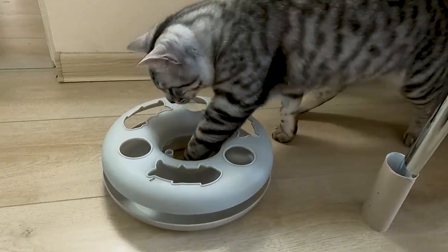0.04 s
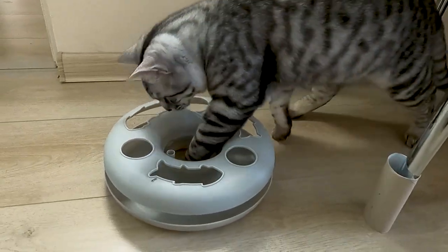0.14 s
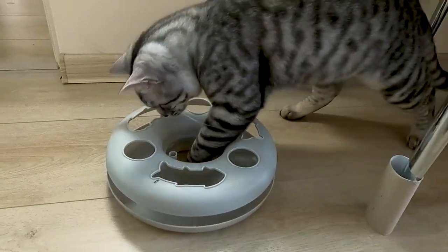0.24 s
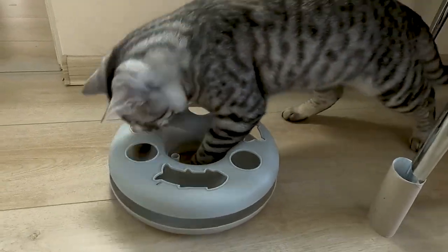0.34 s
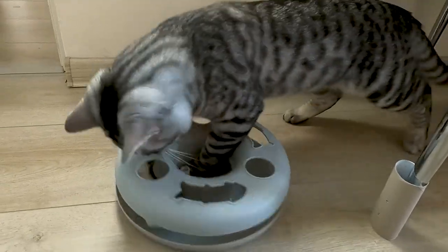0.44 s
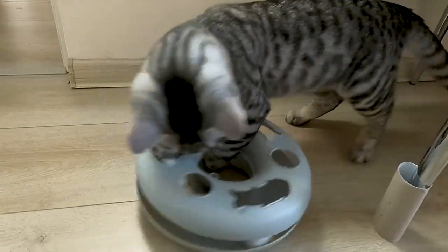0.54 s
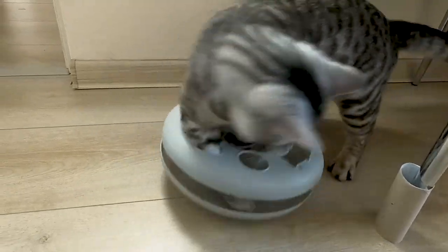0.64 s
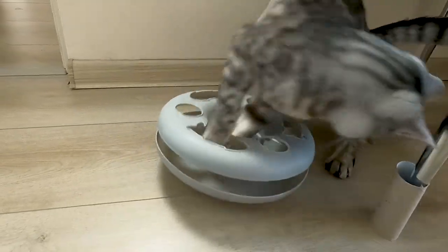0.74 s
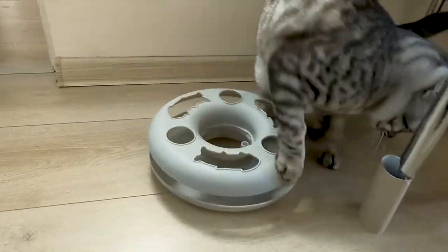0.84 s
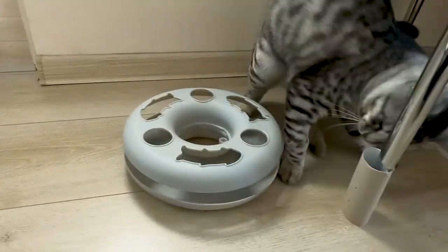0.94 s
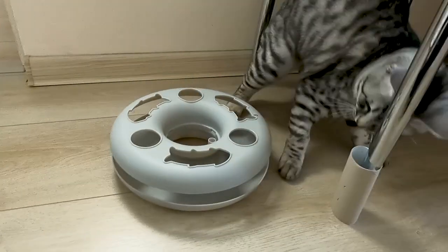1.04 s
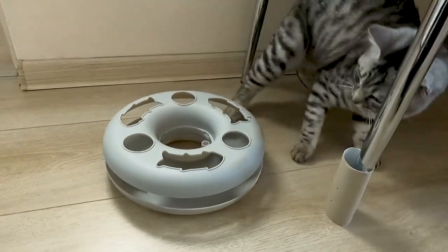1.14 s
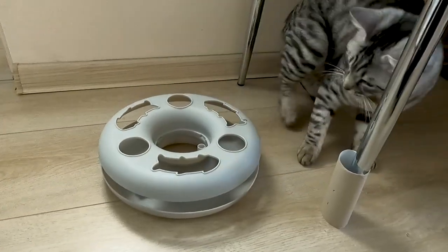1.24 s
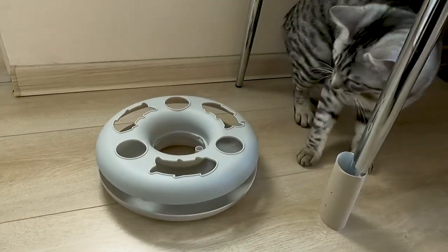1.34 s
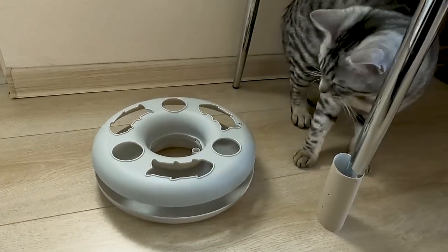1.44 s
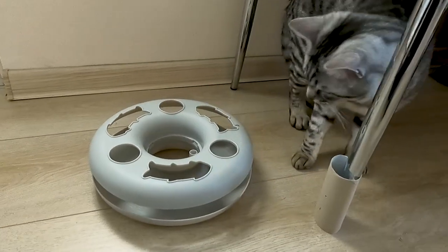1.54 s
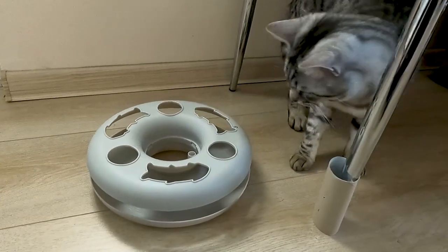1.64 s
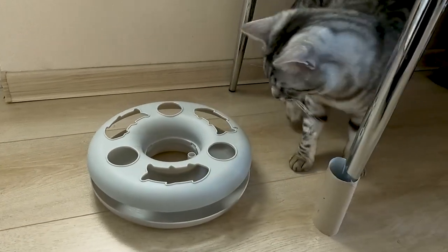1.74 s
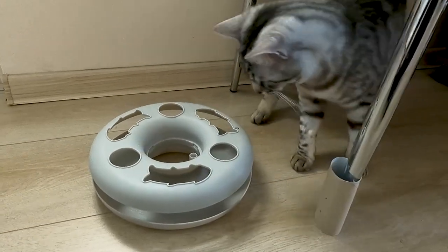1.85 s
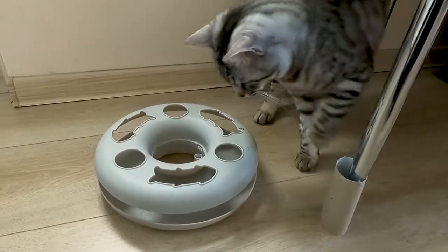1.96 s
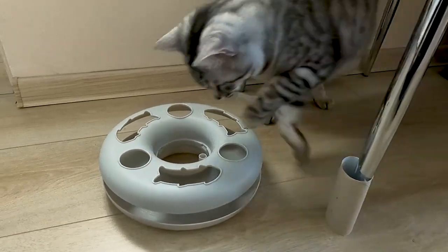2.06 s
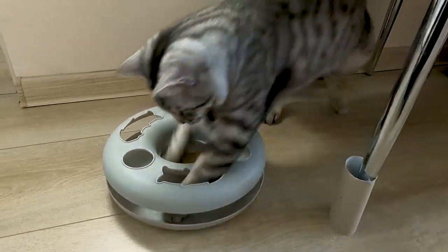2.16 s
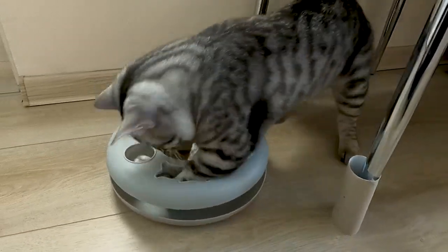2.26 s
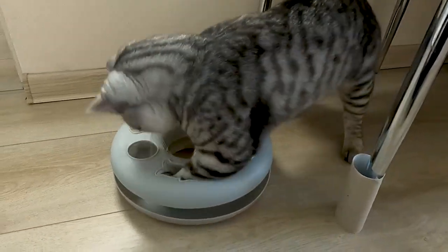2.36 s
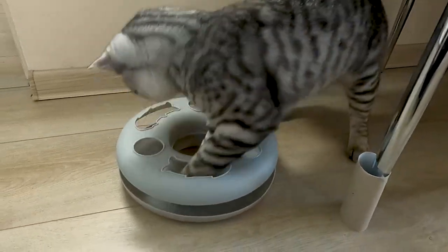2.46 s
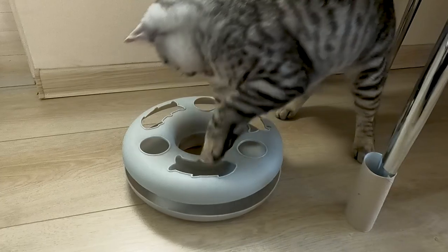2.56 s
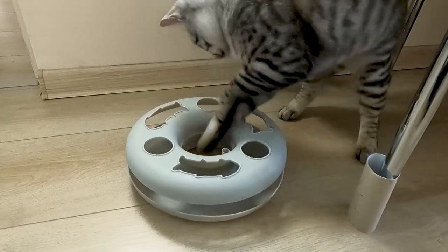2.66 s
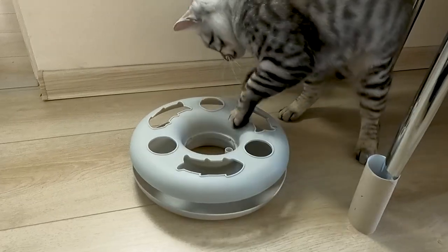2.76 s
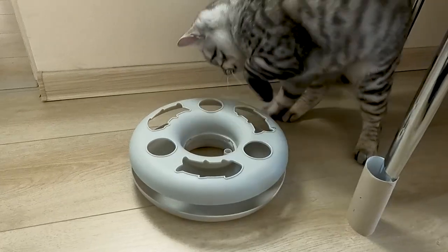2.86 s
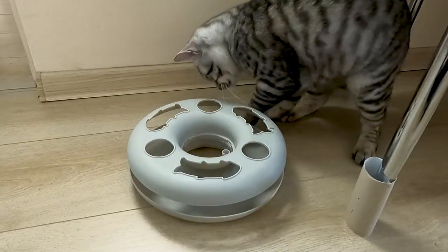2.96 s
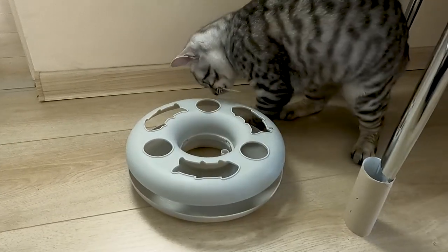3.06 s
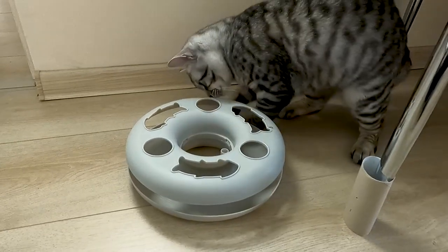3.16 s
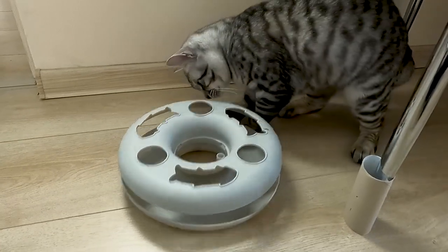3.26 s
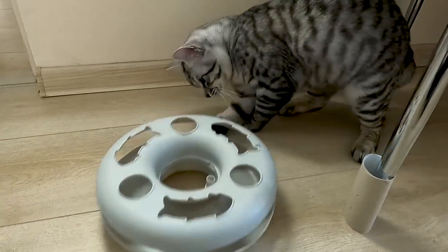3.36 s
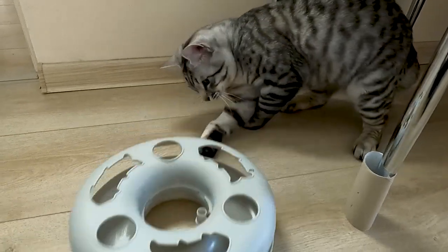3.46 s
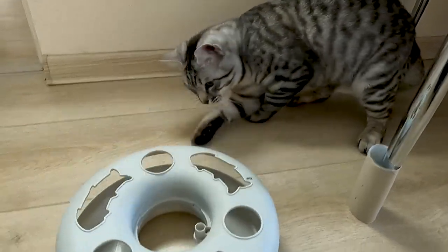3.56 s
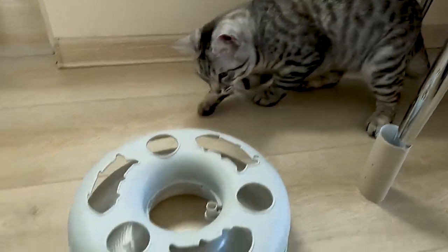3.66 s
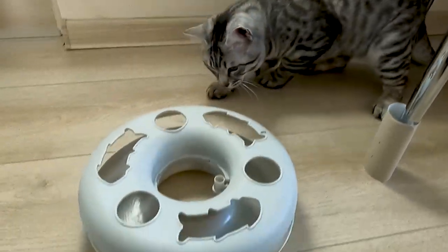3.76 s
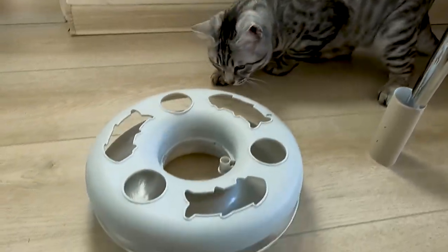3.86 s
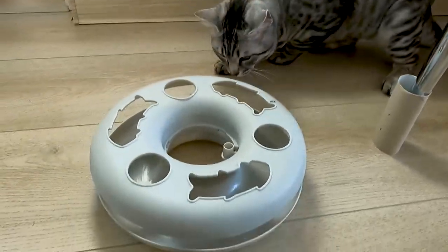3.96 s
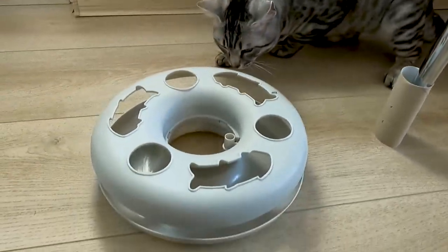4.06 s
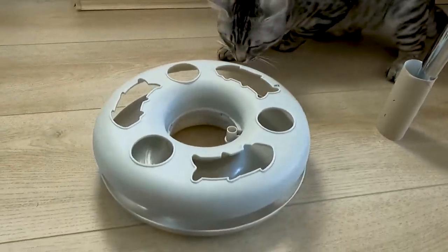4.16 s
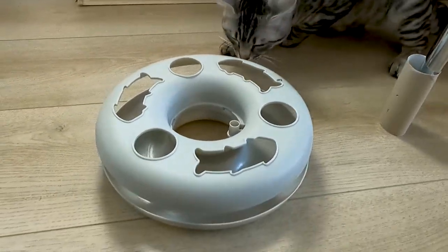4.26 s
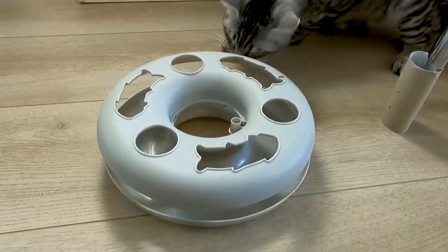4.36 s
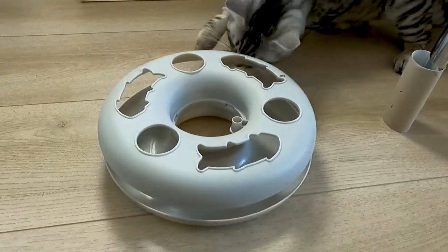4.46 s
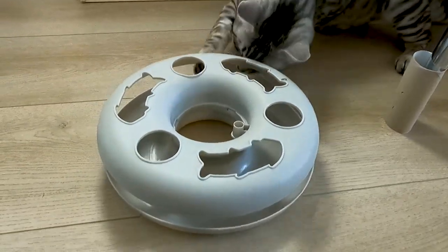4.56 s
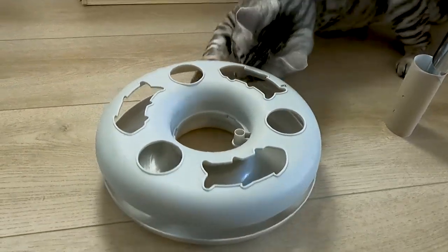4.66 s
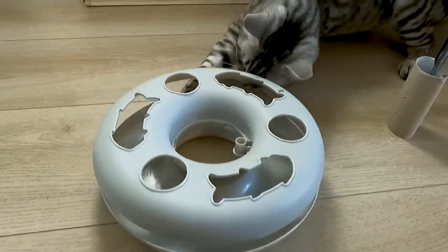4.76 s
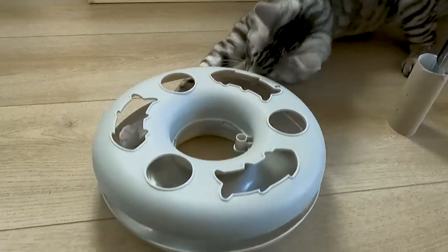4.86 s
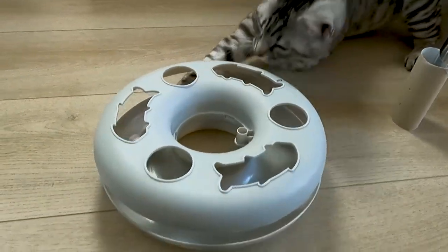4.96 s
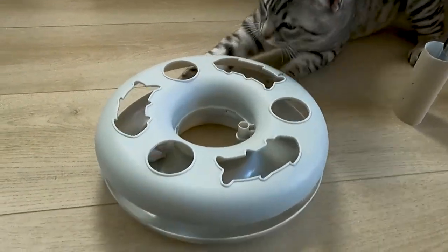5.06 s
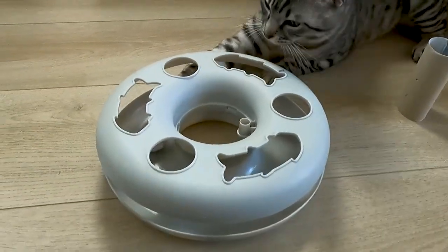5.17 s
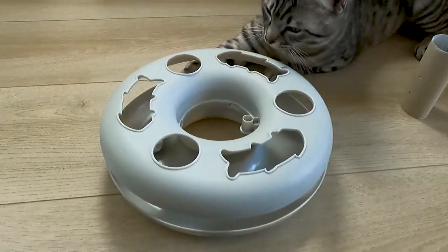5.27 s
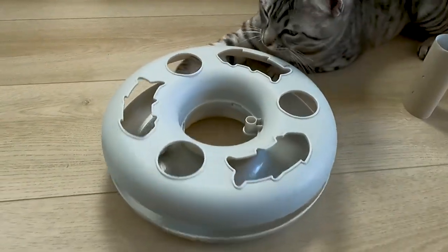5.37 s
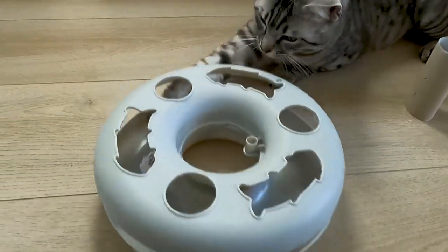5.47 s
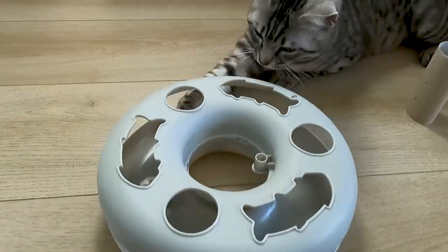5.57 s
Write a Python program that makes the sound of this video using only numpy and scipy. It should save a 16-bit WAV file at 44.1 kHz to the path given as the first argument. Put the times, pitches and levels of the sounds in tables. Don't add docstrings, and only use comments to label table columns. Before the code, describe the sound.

In a small quiet room, a cat paws a hollow plastic ring toy on laminate. Near silence, then a loud gritty scrape with clattering knocks and a sharp squeak; light taps and brief rubs follow, then a smoother second scrape, a pause, a snap, and hesitant jerky drags. Close handheld stereo pickup with faint hiss and low handling rumble.

```python
import sys
import numpy as np
from scipy import signal
from scipy.fft import rfft, irfft, next_fast_len
from scipy.io import wavfile
from scipy.ndimage import uniform_filter1d

SR = 44100
rng = np.random.default_rng(int(sys.argv[2]) if len(sys.argv) > 2 else 0)


def ratio_of_db(decibels):
    return 10 ** (np.asarray(decibels, float) / 20)


def transcribe(u):
    v = np.clip(np.atleast_2d(u).T, -1, 1)
    q = np.round(v * 32767).astype(np.int16)
    wavfile.write(sys.argv[1], SR, q)


N = 247401
TICKS_S = np.arange(0, N, 16) / SR
OPPOSITE = np.array([[1], [-1]])


def noise():
    return rng.standard_normal(N)


def grit(rate_hz, spread_db):
    hits = rng.random(N) < rate_hz / SR
    return unit(hits * noise() * ratio_of_db(spread_db * rng.exponential(size=N)))


def unit(x):
    return x / np.sqrt(np.mean(x ** 2))


def walk(rate_hz):
    hold = int(SR / rate_hz)
    steps = np.repeat(rng.standard_normal(N // hold + 1), hold)
    return unit(uniform_filter1d(steps, hold)[:N])


def ring(x, hz, width_hz):
    return signal.lfilter(*signal.iirpeak(hz, hz / width_hz, fs=SR), x)


def body(x, modes):
    return sum((-1) ** k * ratio_of_db(db) * ring(x, hz, width_hz) for k, (hz, width_hz, db) in enumerate(modes))


def ports(pair, side_db):
    return pair[0] + ratio_of_db(side_db) * pair[1] * OPPOSITE


def curve(rows, column):
    return np.interp(TICKS_S, *np.array(rows)[:, [0, column]].T)


def peaks(rows, rise_db_per_s):
    rows = np.array(rows)
    since_s = TICKS_S - rows[:, :1]
    return np.where(since_s < 0, rise_db_per_s * since_s, -rows[:, -1:] * since_s)


def full(slow):
    return np.interp(np.arange(N) / SR, TICKS_S, slow)


def slow_gain(db):
    return np.repeat(ratio_of_db(db[::16]), 16)[:N]


def bands(source, spectrum, flicker_db, flicker_hz, wide_hz, side_db, spot=0., spot_db=0., spot_width=.2):
    hz_at, db_at = np.transpose(spectrum)
    octaves = np.log2(min(hz_at[-1], 16000) / hz_at[0])
    pair = np.array([source(), source()])
    out = 0
    for hz in hz_at[0] * 2 ** np.arange(0, octaves, 1 / 4):
        edges_hz = [hz / 2 ** (1 / 8), hz * 2 ** (1 / 8)]
        mid, side = signal.sosfilt(signal.butter(2, edges_hz, "bandpass", fs=SR, output="sos"), pair)
        db = np.interp(np.log(hz), np.log(hz_at), db_at) + flicker_db * walk(flicker_hz)
        db = db + spot_db * np.exp(-((np.log(hz) - spot) / spot_width) ** 2)
        db = db - 5.0 * np.clip(spot - np.log(hz) - .4, 0, None)
        band = mid + ratio_of_db(side_db) * hz / (hz + wide_hz) * side * OPPOSITE
        out = -out + slow_gain(db) * band
    return unit(out)


# (frequency [Hz], density [dB per Hz])
HISS_SPECTRUM = [(90, -9.5), (160, 1.5), (200, -1), (300, -7.5), (500, -12), (800, -16), (1300, -16.5),
                 (2000, -24), (3600, -32), (5200, -26), (7600, -31), (9000, -43), (13000, -54)]
# (frequency [Hz], level [dB])
APPLIANCE_HUM = [(156.1, -91.5), (183.0, -87), (619.1, -99.5), (716.0, -87.5)]
HISS_DB = -70


def hush():
    t = np.arange(N) / SR
    hum = 0
    for hz, db in APPLIANCE_HUM:
        hum = hum + np.sqrt(2) * ratio_of_db(db + 2.9 * walk(4.3)) * np.sin(2 * np.pi * hz * t)
    hiss = bands(noise, HISS_SPECTRUM, flicker_db=3.0, flicker_hz=10, wide_hz=400, side_db=2.5)
    return hum + ratio_of_db(HISS_DB) * hiss


# (frequency [Hz], width [Hz], level [dB])
BOARD_MODES = [(153.7, 38, 2.5), (187, 68, -1.5)]
JOIST_MODES = [(67, 96, -3), (93, 74, 0.5)]
# (time [s], board level [dB], joist level [dB], fade [dB/s])
PAW_STEPS = [(.63, -42.5, -44.5, 150), (.84, -54, -53, 120), (.97, -32.5, -37.5, 117.5),
             (2.029, -53.5, -48.5, 249.5), (2.34, -50, -45, 170), (2.56, -58, -75, 76),
             (2.87, -60, -80.5, 80), (3.8, -59, -55.5, 112), (4.2, -71, -62, 200), (4.7, -47.5, -48, 56),
             (4.89, -44.5, -44.5, 92), (5.5, -61, -58, 150), (5.6, -61, -41, 100)]
# (time [s], level [dB])
HAND_TREMOR = [(0.0, -67), (0.36, -67), (1.01, -63), (1.29, -72), (2.0, -65.5), (2.06, -53.5),
               (2.18, -82.5), (2.29, -67.5), (2.95, -75.5), (3.7, -70.5), (3.82, -50), (4.2, -78.5),
               (4.88, -53.5), (4.91, -59), (5.54, -61), (5.6, -74)]
STEP_RISE_DB_PER_S, BOARD_REST_DB, JOIST_REST_DB = 549.5, -76, -79
BOARD_UNDER_HOLLOW_DB = -19


def thuds():
    rubbing_db, load_db, _ = contacts()
    steps = np.array(PAW_STEPS)
    shape_db = peaks(PAW_STEPS, STEP_RISE_DB_PER_S)
    dragged_db = np.maximum((rubbing_db + load_db).max(axis=0) + BOARD_UNDER_HOLLOW_DB, BOARD_REST_DB)
    board_db = full(np.maximum((steps[:, 1:2] + shape_db).max(axis=0), dragged_db))
    joist_db = full(np.maximum((steps[:, 2:3] + shape_db).max(axis=0), JOIST_REST_DB))
    hand_db = full(curve(HAND_TREMOR, column=1))
    boards = unit(body(body(grit(300, 0.8), BOARD_MODES), BOARD_MODES))
    joists = unit(body(body(grit(300, 0.8), JOIST_MODES), JOIST_MODES))
    hand = bands(noise, [(20, -4.5), (32, 1.0), (52, -6.5)],
                 flicker_db=3.0, flicker_hz=7.1, wide_hz=1, side_db=-6.0)
    return ratio_of_db(board_db) * boards + ratio_of_db(joist_db) * joists + ratio_of_db(hand_db) * hand


# (time [s], level [dB], pitch [Hz], fade [dB/s])
RIM_SQUEAKS = [
    (.002, -63.5, 1000, 700),
    (.036, -65.5, 1050, 400),
    (.062, -69, 1070, 200),
    (0.366, -69.5, 997, 60),
    (.4, -63.5, 1006, 250),
    (.428, -68, 1010, 100),
    (0.887, -34, 1040, 260),
    (.898, -14, 1046, 2599.5),
]
SQUEAK_RISE_DB_PER_S, SQUEAK_LASTS_S = 2499.5, .03


def squeak():
    rows = np.array(RIM_SQUEAKS)
    overdue_s = np.clip(TICKS_S - rows[:, :1] - SQUEAK_LASTS_S, 0, None)
    each_db = rows[:, 1:2] + peaks(rows, SQUEAK_RISE_DB_PER_S) - 900 * overdue_s
    pitch_hz = full(rows[each_db.argmax(axis=0), 2]) * (1 + .022 * walk(200))
    phase = 2 * np.pi * np.cumsum(pitch_hz) / SR
    level_db = full(np.clip(each_db.max(axis=0), -120, 0))
    level_db = uniform_filter1d(level_db, size=100) + 2.7 * walk(90)
    return np.sqrt(2) * ratio_of_db(level_db) * (np.sin(phase) + ratio_of_db(-18.5) * np.sin(2 * phase))


# (time [s], level [dB], fade [dB/s])
PAW_BRUSHES = [
    (.01, -82, 13),
    (.25, -81, 20.5),
    (2.01, -82.5, 100),
    (2.2, -79, 42),
    (3.06, -88, 44),
    (3.25, -77, 148),
    (4.0, -80, 40),
]
BRUSH_RISE_DB_PER_S = 151


def brush():
    band = signal.butter(2, [3200, 8000], "bandpass", fs=SR, output="sos")
    fur = signal.sosfilt(band, ports([noise(), noise()], side_db=-9.5))
    each_db = np.array(PAW_BRUSHES)[:, 1:2] + peaks(PAW_BRUSHES, BRUSH_RISE_DB_PER_S)
    return ratio_of_db(full(each_db.max(axis=0))) * unit(fur)


# (time [s], rubbing level [dB], load shaking the shell [dB], rubbing spot pitch [Hz])
LONG_SLIDES = [
    [(.506, -40.5, 3.5, 3957), (.54, -40, -2, 2246), (.58, -32, -5, 5002), (.66, -33.5, -4.5, 3486),
     (.73, -31, -7.5, 3900), (.79, -30, -20, 6730), (.84, -29, -9, 6550), (.89, -32, -10, 3964),
     (.945, -35.5, -14, 4305)],
    [(3.318, -77, 2, 2410), (3.34, -52.5, -5.5, 2073), (3.37, -43.5, -4, 2236), (3.42, -34, -7, 5170),
     (3.475, -31.5, -7, 6373), (3.5, -34, -14, 2926), (3.55, -31.5, -15, 5320), (3.62, -31, -6.5, 5350),
     (3.66, -39, -6.5, 4820)],
    [(3.672, -35.5, -10.5, 5340), (3.72, -36, -5.5, 2408), (3.78, -46, -2.5, 3956)],
    [(4.877, -38, -7, 5173), (4.9, -32.5, -7, 2410), (4.965, -43.5, 5, 2410), (4.98, -46.5, -4, 2413)],
    [(5.471, -58.5, 8, 5170), (5.51, -50.5, -1, 2242), (5.53, -35.5, -6.5, 2240),
     (5.609, -31.5, -11.5, 2407)],
]
DRAG_JERKS = [
    (4.663, -51.5, -13.5, 3268),
    (4.68, -44, -3, 5350),
    (4.74, -46.5, -0.5, 2410),
    (4.775, -44, -4, 2414),
    (4.79, -53, 3, 3620),
    (4.819, -42.5, -1.5, 3452),
    (4.87, -53, 0, 5170),
]
# (time [s], rubbing level [dB], load [dB], spot pitch [Hz], fade [dB/s])
SUDDEN_JOLTS = [(.482, -70, -11, 6000, 61), (.951, -35, 18, 5154, 379.5), (.995, -40.5, 10.5, 3300, 92),
                (1.085, -42.5, 7.5, 5162, 128), (1.26, -60.5, 6, 2934, 103), (1.538, -78, 19.5, 4637, 150),
                (2.314, -39.5, 5, 2235, 147), (2.35, -43, -1, 4820, 129), (2.493, -63, 22.5, 2070, 210),
                (2.633, -53, 2, 5322, 169.5), (2.704, -55, 14, 2068, 450), (2.829, -41, -2, 2402, 198.5),
                (5.161, -61.5, 15.5, 4770, 299.5), (5.36, -66.5, 16.5, 2239, 200)]
GENTLE_SWELLS = [
    (2.29, -71, -4, 4186, 60),
    (2.41, -47, 6, 2256, 200),
    (2.8, -59.5, 7, 3810, 170),
    (1.2, -56, 6.5, 3960, 130),
    (2.4, -62, 8.5, 4820, 160),
    (2.875, -52, 7, 2300, 250),
    (6.3, -61.5, 6.5, 2435, 200),
    (5.01, -51.5, -4.5, 4603, 120),
    (5.23, -55, 5, 2233, 130),
    (5.45, -67, -2, 2403, 100),
]
JOLT_RISE_DB_PER_S, SWELL_RISE_DB_PER_S = 9001, 230.5
COAST_DB_PER_S, COAST_UNLOADS_DB_PER_S = 161.5, 24.5


def contacts():
    rub_db, load_db, spot_hz = [], [], []
    for rows in LONG_SLIDES + [DRAG_JERKS]:
        coasting_s = np.clip(TICKS_S - rows[-1][0], 0, None)
        not_yet = TICKS_S < rows[0][0]
        rub_db.append(curve(rows, column=1) - COAST_DB_PER_S * coasting_s - 200 * not_yet)
        load_db.append(curve(rows, column=2) - COAST_UNLOADS_DB_PER_S * coasting_s)
        spot_hz.append(curve(rows, column=3))
    for rows, rise in ((SUDDEN_JOLTS, JOLT_RISE_DB_PER_S), (GENTLE_SWELLS, SWELL_RISE_DB_PER_S)):
        rub_db += list(np.array(rows)[:, 1:2] + peaks(rows, rise))
        load_db += [row[2] + 0 * TICKS_S for row in rows]
        spot_hz += [row[3] + 0 * TICKS_S for row in rows]
    return np.clip(rub_db, -130, 0), np.array(load_db), np.log(spot_hz)


# (frequency [Hz], density [dB per Hz])
GRIT_SPECTRUM = [(710, -40), (1200, -6.5), (1530, -4), (2260, -2.5), (3370, -1.5), (3880, -1), (4240, -2),
                 (5690, -1.5), (6610, -10), (8000, -16), (10400, -41.5), (17600, -120)]
EDGE_SPECTRUM = [(3820, -28), (6500, 3), (7550, -3.5), (9840, -12), (11200, -12.5), (13300, -22.5),
                 (15600, -41.5)]
# (frequency [Hz], width [Hz], level [dB])
RIM_MODES = [(2370, 130, 3), (2900, 120, -1), (3560, 120, -2), (3900, 200, -3), (4950, 150, -3),
             (5400, 150, -3), (5870, 150, -3), (6850, 200, -3), (7350, 200, -4)]
HOLLOW_MODES = [(258, 50, -5), (339, 57.2, -3), (399, 50, -0.5), (467.8, 60, -3.5), (540, 97, -7)]
WALL_MODES = [(760, 70, -4.5), (925, 56, 2.5), (1025, 96, 1.5), (1185.5, 130, -0.5), (1390, 340, -6)]
RIM_DB, SPOT_LIFT_DB = -6, 7
HOLLOW_DB = -2
WALL_DB, WALL_PER_LOAD = -4.5, .7
EDGE_DB, EDGE_PER_SPEED, EDGE_PER_LOAD, EDGE_DB_PER_OCTAVE = -9.5, .28, -0.43, 2


def shove():
    rubbing_db, load_db, spots = contacts()
    sharp_db = EDGE_DB + EDGE_PER_SPEED * (rubbing_db + 38)
    sharp_db = sharp_db + EDGE_PER_LOAD * np.clip(load_db, -12, 8)
    sharp_db = sharp_db + EDGE_DB_PER_OCTAVE * (spots - np.log(4000)) / np.log(2)
    hiss_db = full(rubbing_db.max(axis=0))
    hollow_db = full((rubbing_db + load_db).max(axis=0))
    wall_db = full((rubbing_db + WALL_DB + WALL_PER_LOAD * load_db).max(axis=0))
    edge_db = full((rubbing_db + sharp_db).max(axis=0))
    strongest = rubbing_db.argmax(axis=0)[None]
    spot = full(np.take_along_axis(spots, strongest, axis=0)[0])

    hiss = bands(lambda: grit(9000, 1.5), GRIT_SPECTRUM, flicker_db=2.0, flicker_hz=41, wide_hz=2506,
                 side_db=-7.0, spot=spot, spot_db=0.5, spot_width=0.23)
    edge = bands(lambda: grit(9000, 1.2), EDGE_SPECTRUM, flicker_db=-0.6, flicker_hz=57, wide_hz=3000,
                 side_db=-3.5)
    rub = ports([grit(4000, 1.3), grit(4000, 1.7)], side_db=-9.5)
    rim = 0
    for hz, width_hz, db in RIM_MODES:
        lift_db = SPOT_LIFT_DB * np.exp(-((np.log(hz) - spot) / .08) ** 2)
        rim = rim + slow_gain(db + 2.8 * walk(20) + lift_db) * ring(rub, hz, width_hz)

    jolts = ports([grit(900, 1.8), grit(900, 1.8)], side_db=-19.0)
    ticks = ports([grit(1500, 1.6), grit(1500, 1.6)], side_db=-10)
    hollow = ratio_of_db(hollow_db + HOLLOW_DB) * unit(body(jolts, HOLLOW_MODES))
    wall = ratio_of_db(wall_db) * unit(body(jolts + ticks, WALL_MODES))
    stutter = ratio_of_db(1.2 * walk(90))
    rubbing = ratio_of_db(hiss_db) * (hiss + ratio_of_db(RIM_DB) * unit(rim)) + ratio_of_db(edge_db) * edge
    return stutter * rubbing + hollow + wall


PAW_PATS = [(.5068, -23, 1985, -36), (0.6269, -11, 4372, -21), (2.4332, -59, 3950, -35),
            (2.4922, -42, 2150, -39), (2.5516, -48, 4900, -49), (2.7365, -52, 1876, -44),
            (3.8101, -40, 4134, -45), (4.705, -26.5, 5900, -41), (4.7872, -39, 2460, -30.5),
            (4.844, -25.5, 6510, -31.5), (4.8763, -31, 6550, -34), (5.3606, -43, 2280, -37.5),
            (5.443, -58, 2420, -42.5), (5.4909, -50, 2380, -33)]
FLOOR_BUMPS = [(.6045, -15.5, 5940, -32), (.61, -13, 2140, -24), (0.7008, -16, 3601, -26),
               (.952, -18, 2330, -14.5), (0.9618, -8.5, 3100, -9), (0.9923, -10.5, 4870, -10),
               (.967, -15, 2360, -21), (1.0416, -26, 2504, -26), (1.066, -38, 5200, -24.5),
               (1.3956, -52, 2450, -58.5), (1.5381, -54, 4400, -55), (2.5032, -40, 2940, -37.5),
               (2.631, -57, 5190, -51.5), (4.8956, -22, 2380, -25), (2.3179, -29, 2280, -20.5)]
BALL_TAPS = [(0.8198, -23, 6532, -29), (1.2659, -38.5, 3000, -43), (1.2805, -42, 3080, -39.5),
             (1.327, -44.5, 4530, -48.5), (1.3613, -43.5, 2960, -55), (1.3787, -55, 3115, -56.5),
             (2.311, -41.5, 2053, -45), (2.7047, -30, 3310, -39), (2.797, -37.5, 3870, -53),
             (2.8295, -30, 3413, -40), (4.6614, -25.5, 3280, -55), (5.084, -52.5, 4600, -65),
             (5.1603, -37.5, 3050, -40), (5.4728, -51, 6240, -63), (5.517, -30, 2400, -46)]
BUMP_WALL_DB, PAT_WALL_DB, TAP_HOLLOW_DB = -4, -12, -5


def blows():
    bumps = [(s, crack, hz, db, db + BUMP_WALL_DB) for s, crack, hz, db in FLOOR_BUMPS]
    pats = [(s, crack, hz, db, db + PAT_WALL_DB) for s, crack, hz, db in PAW_PATS]
    taps = [(s, crack, hz, db + TAP_HOLLOW_DB, db) for s, crack, hz, db in BALL_TAPS]
    return bumps + pats + taps


def shell_ring(modes, spot, t):
    tone = 0
    for (hz, width_hz, db), d in zip(modes, spot):
        wave = np.sin(2 * np.pi * hz * (1 + 0.018 * d) * t)
        tone = tone + ratio_of_db(db + 4.2 * d) * wave * np.exp(-np.pi * width_hz * 1.2 * t)
    tone = tone * (1 - np.exp(-t / 0.00097))
    return tone / abs(tone).max()


def knocks():
    t = np.arange(4096) / SR
    out = np.zeros(N + len(t))
    for s, crack_db, crack_hz, hollow_db, wall_db in blows():
        dice = rng.standard_normal(len(t))
        burst = dice * np.exp(-t / 0.0019)
        plastic = signal.butter(2, [crack_hz / 1.7, crack_hz * 1.97], "bandpass", fs=SR)
        crack = 0.7 * signal.lfilter(*plastic, burst) + ring(burst, crack_hz, 800)
        sound = ratio_of_db(crack_db) * crack / abs(crack).max()
        sound = sound + ratio_of_db(hollow_db + 2.5) * shell_ring(HOLLOW_MODES, dice[-5:], t)
        sound = sound + ratio_of_db(wall_db + 2.5) * shell_ring(WALL_MODES, dice[-10:-5], t)
        i = int(s * SR)
        out[i:i + len(t)] += sound
    return signal.lfilter(*signal.butter(2, 170, "highpass", fs=SR), out[:N])


def flares(rows, width_hz, rough):
    t = np.arange(-4096, 4096) / SR
    out = np.zeros(N + len(t))
    chance = rng.standard_normal((len(rows), 2, len(t)))
    wobble = signal.lfilter(*signal.butter(2, width_hz, fs=SR), chance)
    for (s, length_s, hz, db), (a, b) in zip(rows, wobble / wobble.std()):
        tone = (1 + rough * a) * np.sin(2 * np.pi * hz * t + rough * b)
        tone = tone * np.sqrt(2 / (1 + rough ** 2))
        i = int(s * SR) - len(t) // 2
        out[i:i + len(t)] += ratio_of_db(db) * tone * np.exp(-(2 * t / length_s) ** 2)
    return out[:N]


# (time [s], length [s], frequency [Hz], level [dB])
SHELL_SINGS = [(0.511, 0.029, 1300, -48), (0.604, 0.045, 7600, -47.5), (0.611, 0.032, 6330, -42),
               (0.616, 0.032, 2163, -38.5), (0.631, 0.03, 3450, -34), (0.631, 0.03, 4390, -35.5),
               (0.631, 0.045, 956, -46), (0.683, 0.043, 9100, -46.5), (0.696, 0.046, 4180, -42.5),
               (0.713, 0.039, 3550, -35.5), (0.726, 0.045, 900, -41.5), (0.741, 0.03703, 3924, -35.5),
               (0.743, 0.03, 7410, -42.5), (0.743, 0.045, 5885, -40), (0.758, 0.07, 4926, -41),
               (0.763, 0.034, 1846, -47), (0.773, 0.051, 6850, -38.5), (0.803, 0.06, 10350, -47.5),
               (0.811, 0.037, 5820, -37.5), (0.823, 0.037, 8180, -44), (0.828, 0.032, 6720, -37.5),
               (0.871, 0.047, 2859, -42), (1.043, 0.075, 990, -40), (1.127, 0.037, 997, -48.5),
               (1.175, 0.081, 1086, -52.5), (2.317, 0.03, 993, -49.5), (2.322, 0.028, 2305, -50),
               (2.849, 0.048, 2326, -48), (3.41, 0.038, 5230, -48), (3.43, 0.047, 3920, -44.5),
               (3.477, 0.03, 4900, -42), (3.534, 0.077, 2960, -43), (3.554, 0.035, 2200, -41),
               (3.572, 0.032, 3820, -38), (3.579, 0.041, 990, -42), (3.587, 0.04, 5460, -38),
               (3.604, 0.041, 7060, -41), (3.652, 0.07, 944, -45), (3.712, 0.047, 2370, -47),
               (3.734, 0.032, 960, -46), (4.669, 0.036, 1211, -60), (4.764, 0.027, 2390, -50),
               (4.817, 0.035, 2370, -53), (4.906, 0.03, 2370, -37), (4.961, 0.05, 2400, -52),
               (5.522, 0.035, 1033, -53), (5.532, 0.041, 2970, -48), (5.572, 0.03, 11070, -54),
               (5.572, 0.045, 1028, -46), (5.6, 0.022, 2400, -42)]


def sings():
    return flares(SHELL_SINGS, width_hz=90, rough=.6)


# (time [s], length [s], frequency [Hz], level [dB])
HOLLOW_BOOMS = [(0.566, 0.012, 464, -36), (0.574, 0.052, 372, -44.5), (0.649, 0.015, 400, -40),
                (0.693, 0.039, 400, -40), (0.706, 0.015, 373, -33), (0.741, 0.02, 400, -40.5),
                (0.771, 0.025, 570, -42.5), (0.801, 0.012, 400, -48), (0.821, 0.017, 370, -36),
                (0.826, 0.03, 400, -45), (0.863, 0.022, 400, -41), (1.17, 0.022, 260, -55),
                (1.282, 0.03, 341, -55), (2.322, 0.015, 400, -37), (2.437, 0.012, 430, -47.5),
                (2.497, 0.015, 322, -39.5), (2.741, 0.022, 400, -53), (2.881, 0.029, 400, -49),
                (2.913, 0.04, 370, -61), (3.37, 0.015, 319, -49.5), (3.387, 0.02, 400, -49),
                (3.432, 0.052, 400, -45.5), (3.447, 0.014, 400, -37), (3.475, 0.012, 370, -41),
                (3.505, 0.025, 460, -46), (3.529, 0.056, 488, -48), (3.539, 0.041, 460, -44),
                (3.567, 0.05, 400, -46), (3.604, 0.018, 374, -41), (3.687, 0.021, 400, -45),
                (3.761, 0.015, 430, -52), (4.934, 0.025, 371.2, -40), (4.964, 0.014, 370, -38),
                (5.166, 0.012, 493, -49), (5.191, 0.015, 460, -54.5), (5.216, 0.022, 400, -57),
                (5.248, 0.012, 550, -54), (5.29, 0.012, 430, -53), (5.363, 0.013, 494, -50),
                (5.495, 0.017, 370, -42), (5.522, 0.016, 464, -44), (5.547, 0.018, 430, -43),
                (5.585, 0.017, 368, -39.5), (5.605, 0.015, 370, -43)]


def rocks():
    return flares(HOLLOW_BOOMS, width_hz=40, rough=.25)


# (time [s], frequency [Hz], level [dB], decay [s])
CLAW_PLUCKS = [
    (3.915, 1100, -55, 0.0025),
    (3.926, 1247, -47.5, 0.0035),
    (4.6405, 3300, -53.5, .001),
    (4.6505, 3370, -45, .001),
    (4.6611, 3330, -16.5, 0.001),
]


def plucks():
    t = np.arange(2048) / SR
    out = np.zeros(N)
    for s, hz, db, decay_s in CLAW_PLUCKS:
        envelope = np.exp(-t / decay_s) * (1 - np.exp(-t / 0.00022))
        i = int(s * SR)
        out[i:i + len(t)] += ratio_of_db(db) * np.sin(2 * np.pi * hz * t) * envelope
    return out


ROOM_T60_LOW_S, ROOM_T60_HIGH_S, ROOM_DB = 0.3, 0.25, -11.5


def room(x):
    t = np.arange(SR // 2) / SR
    mid, side = rng.standard_normal((2, len(t)))
    soft = signal.butter(1, 900, fs=SR)
    tails = mid + (1.2 * side - .7 * signal.lfilter(*soft, side)) * OPPOSITE
    low = signal.lfilter(*soft, tails)
    tails = low * ratio_of_db(-60 * t / ROOM_T60_LOW_S) + (tails - low) * ratio_of_db(-60 * t / ROOM_T60_HIGH_S)
    onset = np.clip(t / 0.0052 - 1, 0, 1)
    tails = tails * onset / np.sqrt(np.sum(tails ** 2) / 2)
    return ratio_of_db(ROOM_DB) * signal.fftconvolve(x.mean(axis=0)[None], tails, axes=1)[:, :N]


def scene():
    near = squeak() + brush() + shove() + knocks() + sings() + rocks() + plucks()
    return hush() + thuds() + near + room(near)


def low_pass(x):
    return signal.sosfilt(signal.butter(12, 15770, fs=SR, output="sos"), x)


# (frequency [Hz], phase [rad])
LEFT_PORT_LEAD = [(0, 0), (1400, -.3), (2800, -.6), (7000, -.55), (11000, 0)]
LEFT_DB, MIC_TOP_HZ = .3, 13700


def record(dry):
    size = next_fast_len(N)
    lead_rad = np.interp(np.fft.rfftfreq(size, 1 / SR), *np.transpose(LEFT_PORT_LEAD))
    left = irfft(rfft(dry[0], size) * np.exp(1j * lead_rad), size)[:N]
    pair = np.array([ratio_of_db(LEFT_DB) * left, dry[1]])
    pair = signal.sosfilt(signal.butter(8, MIC_TOP_HZ, fs=SR, output="sos"), pair)
    return low_pass(pair)


dry = scene()
out = record(dry)
transcribe(out)
```